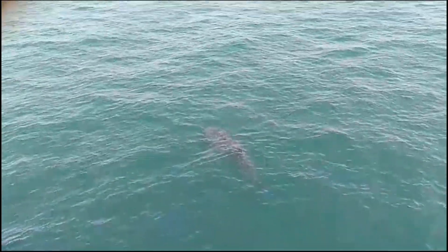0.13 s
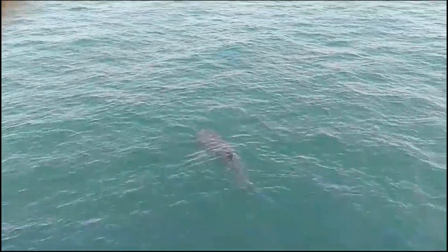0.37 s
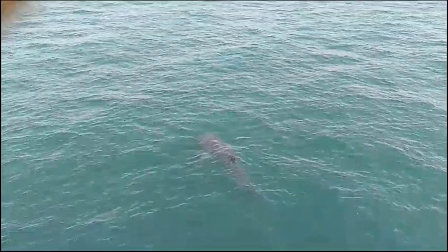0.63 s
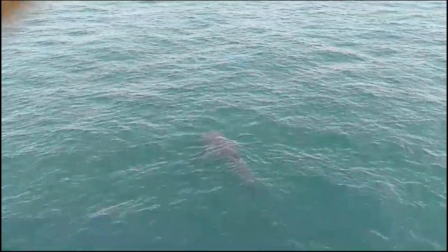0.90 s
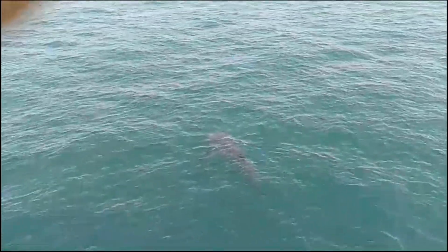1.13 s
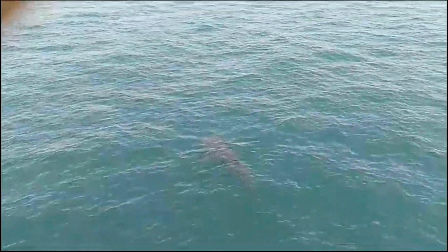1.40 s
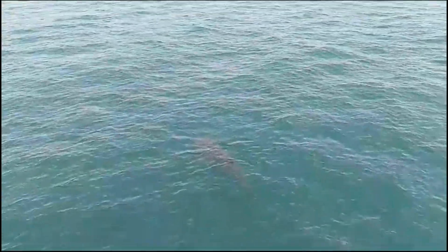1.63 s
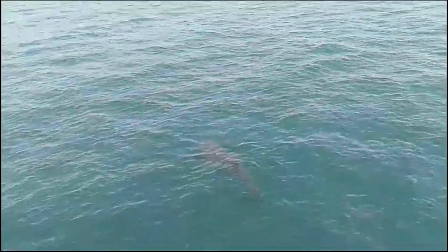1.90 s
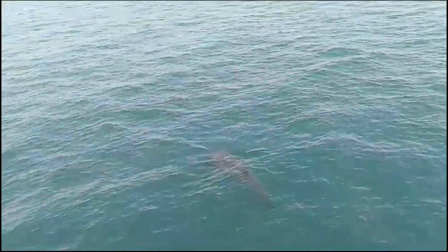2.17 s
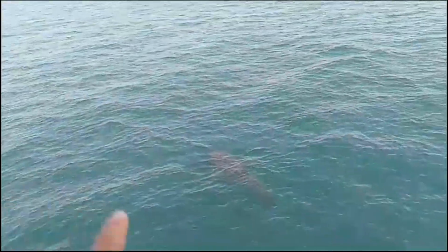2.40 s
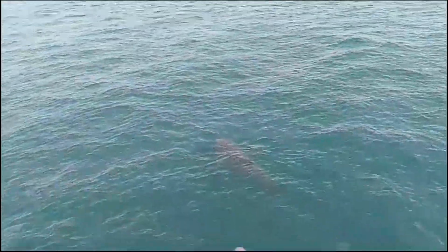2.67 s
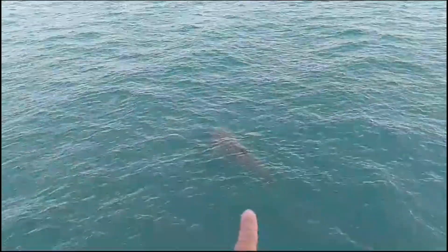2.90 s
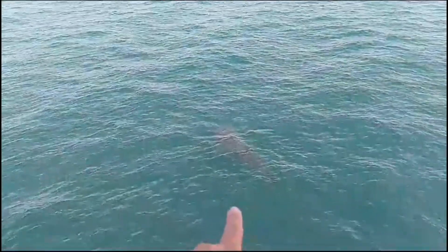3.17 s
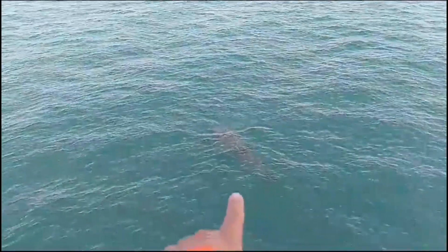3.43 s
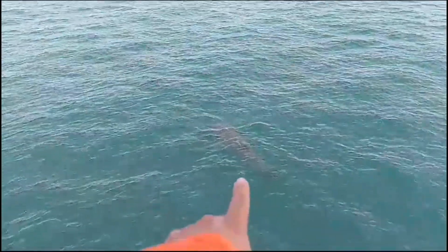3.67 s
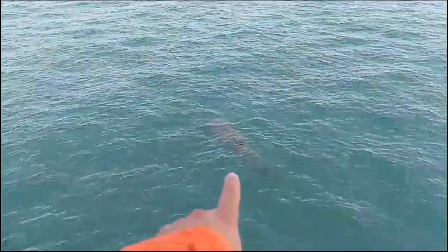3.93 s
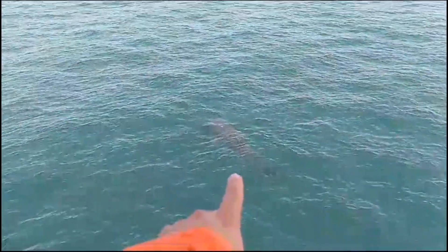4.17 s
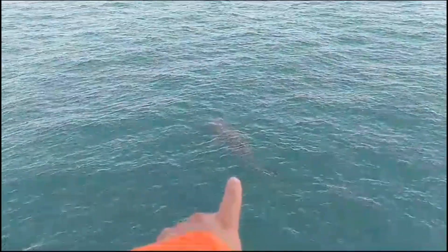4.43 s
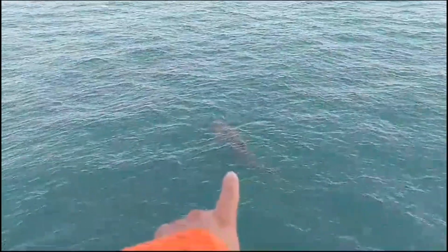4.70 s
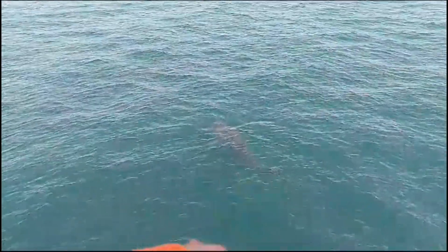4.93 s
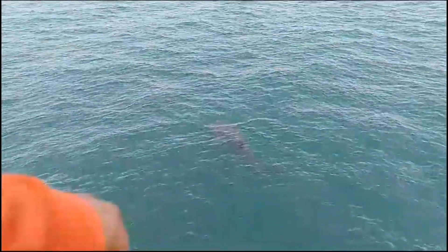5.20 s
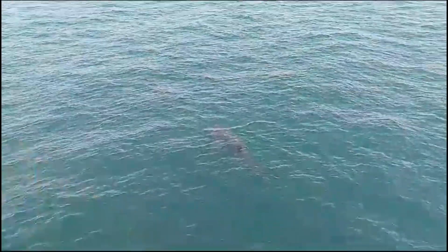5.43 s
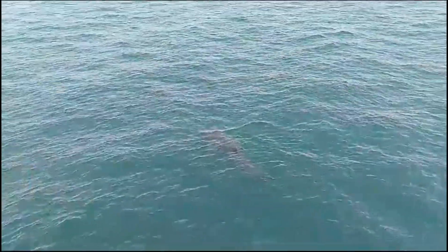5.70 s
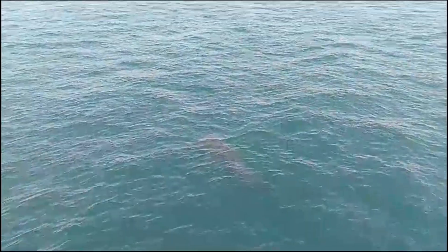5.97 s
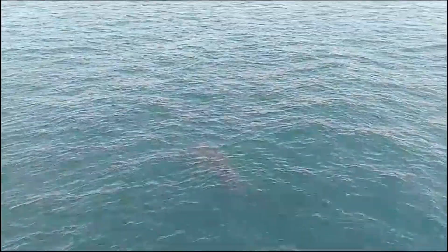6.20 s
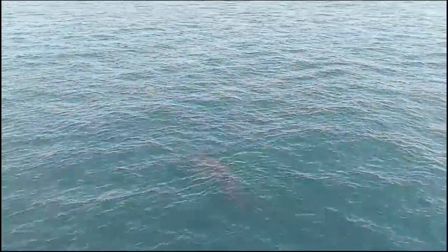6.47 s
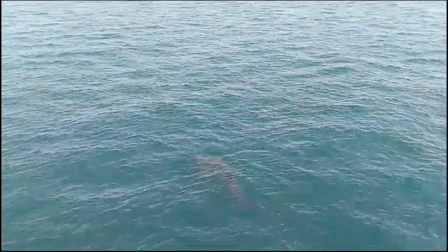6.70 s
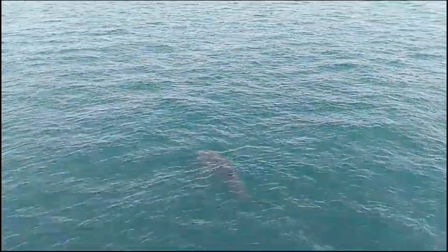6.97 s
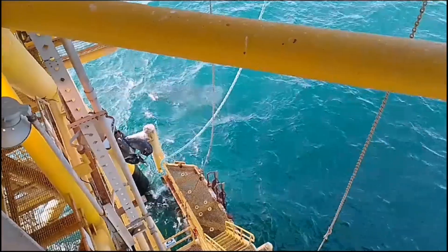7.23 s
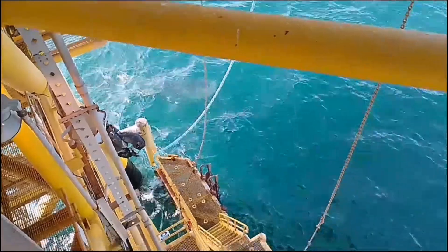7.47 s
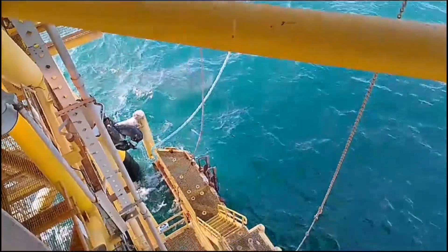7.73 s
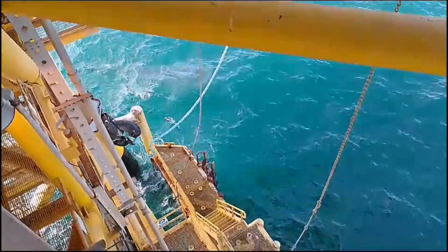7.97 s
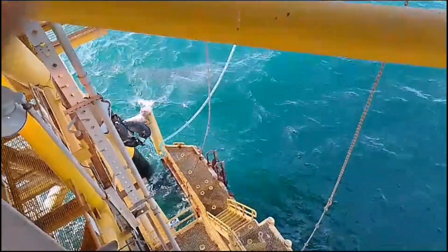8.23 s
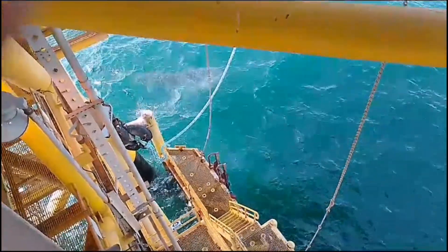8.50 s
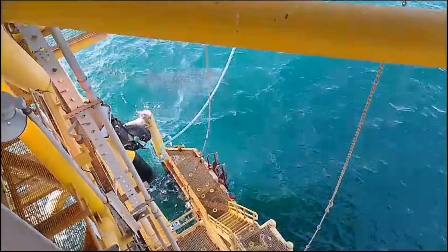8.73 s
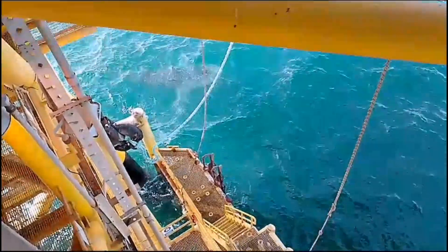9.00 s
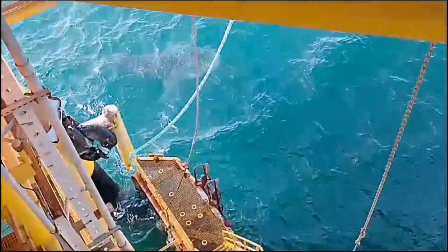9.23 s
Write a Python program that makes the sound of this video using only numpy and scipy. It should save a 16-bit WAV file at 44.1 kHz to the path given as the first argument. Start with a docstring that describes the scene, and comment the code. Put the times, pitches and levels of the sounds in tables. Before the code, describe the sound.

From 0 s, a dense machine drone fills the stereo field at an offshore platform rail: low engine hum with many buzzing harmonics, broad rumble coloured by ringing steel casings, and a fairly constant gear whine near 1 kHz. A faint dry tick sounds at about 0.26 s. In the treble, an air pump puffs soft hissing bursts roughly six per second, slightly uneven, every fourth stronger, over a steady leak; its pressure peaks around 2.3 s, stays strong until past 5.5 s, then eases near 6.7 s. The whine dips near 4 s and swells near 6 s. At 7.09 s all sound cuts abruptly to silence. From 7.3 s a second position closer to the machines fades in within about 0.13 s: heavier, steadier low hum, more prominent whine and thick roar, without pump puffs, holding almost unchanged to the end at about 9.4 s.

```python
"""Machinery deck of a sea platform heard from two places.
First the rail: a tick at 0.26 s, engine hum in shaft-order sines, gear whine near 1 kHz, a broad rumble of
filtered noise with resonant steel casings, and noise puffs from an air pump in the treble.
At 7.09 s it cuts to silence; from 7.3 s a second place, nearer the machines, fades in within 0.13 s:
the same kinds of hum, whine and rumble to the end, without the pump."""
import sys
import numpy as np
from scipy import signal
from scipy.io import wavfile
from scipy.ndimage import uniform_filter1d

SR = 44100
rng = np.random.default_rng(int(sys.argv[2]) if len(sys.argv) > 2 else 0)


def invert_db(level):
    """Linear amplitude ratio for a level in decibels (20 dB per decade), elementwise."""
    return 10 ** (np.asarray(level, dtype=float) / 20)


def persist_wave(psi):
    """Save psi, clipped to +-1, as 16-bit WAV."""
    counts = np.round(np.clip(psi, -1, 1) * 32767).astype(np.int16)
    wavfile.write(sys.argv[1], SR, np.atleast_2d(counts).T)


N = 413216
CUT_S = 7.0895  # end of the first place


def read(points, hz):
    """A spectrum table read on a log-frequency axis."""
    f, value = np.transpose(points)
    return np.interp(np.log(hz + 1), np.log(f + 1), value)


def slow(shape, width):
    """Unit random values smoothed along the last axis."""
    x = uniform_filter1d(rng.standard_normal(shape), width)
    x = uniform_filter1d(x, width)
    return x / x.std()


def noise(level_db, like, lead, lean, size):
    """Stereo noise from random short-time spectra; level_db(hz, t) is power per Hz, like(hz, t) likeness."""
    hop = size // 4
    hz = np.fft.rfftfreq(size, 1 / SR)[:, None]
    t = np.arange(N // hop + 5) * hop / SR
    a, b, c, d = rng.standard_normal((len(t), len(hz), 4)).T
    shared, own = a + 1j * b, c + 1j * d
    same = np.clip(like(hz, t), -1, 1)
    lean_db = read(lean, hz)
    left = shared * np.exp(1j * read(lead, hz)) * invert_db(lean_db / 2)
    right = (same * shared + np.sqrt(1 - same ** 2) * own) * invert_db(-lean_db / 2)
    scale = np.sqrt(3 * SR / (2 * size))  # unit power per Hz
    z = np.array([left, right]) * invert_db(level_db(hz, t)) * scale
    return signal.istft(z, nperseg=size, noverlap=size - hop)[1][:, :N]


RATED_HZ = 15.89  # shaft speed at which tone frequencies are listed
FAINT_SCATTER_DB, TOP_ORDER = 3.5, 70


def tones(speed, orders, faint, whines, whine_swell, phase, lean, waver, whine_waver, scatter_hz):
    """Sines locked to the shaft; reflections off steel make higher orders waver and shift between the ears."""
    t = np.arange(N // 8 + 1) * 8 / SR
    turns = np.cumsum(np.interp(t, *np.transpose(speed))) * 8 / SR
    strong, strong_db = np.transpose(orders)
    others = np.setdiff1d(np.arange(TOP_ORDER) + 1, strong)
    others_db = read(faint, others * RATED_HZ) + FAINT_SCATTER_DB * rng.standard_normal(len(others))
    order_hz = np.r_[strong, others] * RATED_HZ
    order_db = np.r_[strong_db, others_db]
    spread = np.minimum(order_hz / scatter_hz, 1)  # high orders come from many sides
    lean_random, lead_random = rng.standard_normal((len(order_hz), 2)).T
    lean_db = 3 * spread * lean_random + read(lean, order_hz)
    lead_rad = 0.9 * spread * lead_random + read(phase, order_hz)
    order_rows = np.c_[order_hz, order_db, lean_db, lead_rad, waver * np.sqrt(spread)]
    whine_rows = np.c_[whines, np.full(len(whines), whine_waver)]
    gear = invert_db(np.interp(t, *np.transpose(whine_swell)))
    coarse = np.linspace(0, t[-1], 200)
    out = np.zeros((2, len(t)))
    for hz, db, lr_db, rad, depth in np.r_[order_rows, whine_rows]:
        re, im = slow((2, 200), 7)
        drift = np.interp(t, coarse, re + 1j * im)
        gain = (1 + depth * drift) / np.sqrt(1 + 2 * depth ** 2)
        if abs(hz - 1000) < 20:  # main gear pair swells with load
            gain = gain * gear
        carrier = np.exp(2j * np.pi * (hz / RATED_HZ * turns + rng.random()))
        z = invert_db(db) * np.sqrt(2) * gain * carrier
        out += [(z * np.exp(1j * rad)).real * invert_db(lr_db / 2), z.real * invert_db(-lr_db / 2)]
    return signal.resample_poly(out, 8, 1, axis=1)[:, :N]


# four strokes repeat: peak re air pressure level/dB, half length/s
CYCLE = [(0.5, 0.053), (-3.5, 0.021), (-2.5, .05), (-5.5, 0.029)]
FIRST_STROKE_S, STROKE_S = 0.159, 0.1708
STROKE_JITTER_S, STROKE_SCATTER_DB = 0.01, 1


def strokes(pressure):
    """Rows (t/s, peak/dB, half length/s): the four-stroke cycle under the air pressure, slightly uneven."""
    s = np.arange(FIRST_STROKE_S, CUT_S, STROKE_S)
    db, half = np.resize(CYCLE, (len(s), 2)).T
    late, louder = rng.standard_normal((len(s), 2)).T
    db = db + np.interp(s, *np.transpose(pressure)) + STROKE_SCATTER_DB * louder
    return np.c_[s + STROKE_JITTER_S * late, db, half]


# puff colour before flow: f/Hz, level/dB per Hz
PUFF_COLOUR = [(600, -83), (1500, -73.5), (3000, -77.5), (5000, -80.5), (8000, -82), (11000, -83),
               (15500, -88)]
# extra puffs off the beat: t/s, peak level/dB, half length/s
SURGES = [(.769, -8.5, .06), (2.288, -2.5, 0.03), (4.852, -7, 0.046)]
# air pressure: t/s, level/dB
PRESSURE = [(0, -6.5), (1, -9.5), (1.9, -7), (2.3, -3.5), (4, -5), (5.6, -4.5), (6.1, -7.5), (6.7, -9),
            (7.1, -6.5)]
# left-right likeness of the puffs, before the offset below: f/Hz, likeness/1
PUFF_SAME = [(1000, .3), (6500, 0.11), (8600, 0.72), (10000, 1), (13000, 0.6), (14500, 1)]
# weight of the offset subtracted from the likeness: f/Hz, weight/1
OFFSET_WEIGHT = [(9800, 0.26), (10600, 1), (12800, 0.69), (13500, 0)]
# offset before weighting: t/s, offset/1
LIKENESS_OFFSET = [(1.9, .1), (2.2, .6), (2.7, .6), (3, 1.7), (5.7, 1.8), (6, .2)]
LEAK_DB = -11  # below pressure level
BRIGHTEN, BRIGHT_HZ = 0.5, 12000  # share of each pressure change added again at BRIGHT_HZ


def pump(lead, lean):
    """Noise puffs of air, every fourth stronger, over a steady leak; harder air is brighter."""
    puffs = np.r_[strokes(PRESSURE), SURGES]

    def level_db(hz, t):
        pressure_db = np.interp(t, *np.transpose(PRESSURE))
        flow = invert_db(2 * (LEAK_DB + pressure_db))  # power
        for s, db, half in puffs:
            flow += invert_db(2 * db) * np.exp(-((t - s) / half) ** 2)
        patches = uniform_filter1d(slow((len(hz), len(t)), 7), 16, 0)  # random level patches, about 1.4 kHz wide
        bright_db = BRIGHTEN * (pressure_db - pressure_db.mean()) * hz / BRIGHT_HZ
        patches_db = 2.6 * patches / patches.std()
        return read(PUFF_COLOUR, hz) + bright_db + 10 * np.log10(flow) + patches_db

    def like(hz, t):
        offset = np.interp(t, *np.transpose(LIKENESS_OFFSET))
        return read(PUFF_SAME, hz) - read(OFFSET_WEIGHT, hz) * offset
    return noise(level_db, like, lead, lean, size=512)


# small dry tick: t/s, peak level/dB, f/Hz, t60/s
TICK = (.259, -31, 5800, .003)


def tick():
    """One short ring: a sine decaying exponentially."""
    s, db, hz, t60 = TICK
    t = np.maximum(np.arange(N) / SR - s, 0)
    return invert_db(np.maximum(db - 60 * t / t60, -200)) * np.sin(2 * np.pi * hz * t)


SWELL_HZ, SWELL_WIDTH_HZ = 310, 320  # band that swells most


def roar(spectrum, rings, swell, same, lead, lean, patchy_db, lump_scale):
    """Broad machine noise; casing and pipe resonances and a broad lift near 6.4 kHz raise bands, random patches
    drift through it."""
    def level_db(hz, t):
        lift_db = sum(db / (1 + (2 * (hz - f) / width) ** 2) for f, width, db in rings)
        patches = uniform_filter1d(slow((len(hz), len(t)), 3), 40, 0)
        patches_db = patchy_db * patches / patches.std()
        lumps = uniform_filter1d(slow((len(hz), len(t)), 4), 4, 0)
        lumps_db = lump_scale * lumps * (hz < 500)  # low rumble surges in narrow lumps
        swell_db = np.interp(t, *np.transpose(swell)) / (1 + (2 * (hz - SWELL_HZ) / SWELL_WIDTH_HZ) ** 2)
        return read(spectrum, hz) + lift_db + swell_db + patches_db + lumps_db
    return noise(level_db, lambda hz, t: read(same, hz), lead, lean, size=4096)


# shaft speed: t/s, f/Hz
SPEED_RAIL = [(0, 15.875), (1, 15.91), (2.7, 15.907), (3.6, 15.875), (4.4, 15.875), (5.4, 15.93),
              (7.05, 15.942)]
# strong shaft orders, halves from uneven firing: multiple/1, level/dB rms
ORDERS_RAIL = [(4, -41.5), (5, -40), (5.5, -45), (6, -44.5), (6.5, -39), (7.5, -41.5), (9, -48), (9.5, -43),
               (10.5, -46.5), (14, -48.5), (15, -44), (16, -42), (17, -45), (18, -44.5), (19, -47.5),
               (21, -43), (22, -43), (23, -41.5), (24, -44.5), (26, -46), (27, -46), (31, -47), (34, -51.5),
               (41, -52)]
# other whole orders, before scatter: f/Hz, level/dB rms
FAINT_RAIL = [(16, -80), (32, -52), (480, -51), (600, -58), (850, -70), (950, -57), (1110, -65)]
# gear whines and lower hums, before swell: f/Hz at RATED_HZ, level/dB rms, left-right/dB, left lead/rad
WHINES_RAIL = [(29.9, -51.5, -0.1, 0.0), (34.8, -54.7, -0.2, 0.0), (60.1, -46.2, -0.0, 0.0),
               (75.0, -41.0, 0.2, 0.1), (90.2, -41.3, 0.2, 0.1), (128.0, -50.0, -0.2, 0.0),
               (306.2, -39.6, -0.0, 0.0), (922.6, -48.2, -2.2, -1.8), (962.8, -55.3, -2.3, 2.8),
               (994.2, -42.6, -0.5, -1.0), (1009.9, -44.3, -6.9, -0.5), (1460.7, -52.5, -0.3, -2.1),
               (1476.5, -55.2, -7.9, -1.6)]
# main gear pair swell: t/s, level/dB
WHINE_SWELL_RAIL = [(0, -2), (2, 0), (3, -0.7), (4.1, -3.5), (4.7, -1), (5.9, 2.5), (6.4, -0.5), (7.1, 0.5)]
# rumble and roar between the lines, before lifts: f/Hz, level/dB per Hz
ROAR_RAIL = [(20, -78), (32, -73), (60, -55), (110, -53.5), (200, -59), (260, -52.5), (450, -60),
             (850, -71), (1250, -74.5), (2000, -76), (2700, -80), (4500, -87), (9000, -91.5), (15500, -112)]
# ringing casings and pipes, and a broad lift near 6.4 kHz: f/Hz, width/Hz, lift/dB
RINGS_RAIL = [(982, 105, 8.5), (1476, 260, 4.5), (2317, 160, 7), (3097, 270, 13.5), (4030, 120, 4.5),
              (6440, 670, 9.5), (7440, 300, 6.5)]
# low rumble swell at SWELL_HZ: t/s, level/dB
SWELL_RAIL = [(0, -2), (1.5, -1.5), (2.5, 1.5), (3.7, 1.5), (4.8, 1.5), (5.4, -1), (7.1, -1)]
# left-right likeness, clipped to -1..1: f/Hz, likeness/1
SAME_RAIL = [(40, 2), (130, 1), (290, 0.87), (640, .5), (1400, 0.3), (3100, -0.03), (6000, 0.28),
             (8600, 1.4), (15000, -1.5)]
# left-right phase: f/Hz, left lead/rad
LEAD_RAIL = [(300, 0), (520, 0.2), (1460, -2.5), (6000, 0.5)]
# left-right balance: f/Hz, left re right/dB
LEAN_RAIL = [(60, 0.0), (240, 0.0), (950, -1.0), (3770, -1.0), (15000, 0.5)]


def rail():
    """First place, at the rail facing the sea: hum, pump, tick and roar summed."""
    hum = tones(SPEED_RAIL, ORDERS_RAIL, FAINT_RAIL, WHINES_RAIL, WHINE_SWELL_RAIL, LEAD_RAIL, LEAN_RAIL,
                waver=0.6, whine_waver=0.12, scatter_hz=800)
    rumble = roar(ROAR_RAIL, RINGS_RAIL, SWELL_RAIL, SAME_RAIL, LEAD_RAIL, LEAN_RAIL,
                  patchy_db=1.0, lump_scale=5.0)
    return hum + rumble + pump(LEAD_RAIL, LEAN_RAIL) + tick()


# shaft speed: t/s, f/Hz
SPEED_DECK = [(0, 15.898)]
# strong shaft orders, halves from uneven firing: multiple/1, level/dB rms
ORDERS_DECK = [ (3, -44), (4, -42.5), (5, -41), (5.5, -41.5), (6, -33), (6.5, -46), (7, -40.5), (7.5, -44),
               (9, -41), (10.5, -44.5), (11, -45.5), (16, -43), (17, -40.5), (19, -46), (23, -41),
               (24, -46), (26, -44), (27, -38), (28, -44.5), (30, -45.5), (31, -42), (32, -42.5), (36, -47),
               (42, -47), (43, -49), (52, -48.5), (54, -49.5), (58, -50), (60, -42.5)]
# other whole orders, before scatter: f/Hz, level/dB rms
FAINT_DECK = [(16, -74), (60, -50), (130, -48), (480, -50), (620, -55), (900, -60), (1110, -56)]
# gear whines and lower hums, before swell: f/Hz at RATED_HZ, level/dB rms, left-right/dB, left lead/rad
WHINES_DECK = [(74.9, -49, -1, 0), (89.9, -32.3, 0, .2), (165.1, -42, 1.1, .1), (215.8, -47, -2, .4),
               (262, -47, -.5, .2), (375, -43.8, 1.6, .3), (923.9, -49, -1.8, .3), (963.8, -44.1, 4.9, .3),
               (995, -35.6, 2, .9), (1010.7, -51.2, 8, -.7), (1462.5, -49.2, 6.3, -2.3),
               (1510.5, -53.4, 3.4, 2.1), (2305.8, -57.9, 8, -1.8), (2464, -56.5, 2.8, .4)]
# main gear pair swell: t/s, level/dB
WHINE_SWELL_DECK = [(7.4, 0.9), (8.4, 0.4), (9.4, -0.9)]
# rumble and roar between the lines, before lifts: f/Hz, level/dB per Hz
ROAR_DECK = [(20, -72), (32, -66), (60, -63), (110, -56), (200, -61), (260, -58.5), (450, -60),
             (850, -69.5), (1250, -66.5), (2000, -68.5), (2700, -74), (4500, -83.5), (9000, -90.5),
             (15500, -93.5)]
# ringing casings and pipes, and a broad lift near 6.4 kHz: f/Hz, width/Hz, lift/dB
RINGS_DECK = [(960, 80, 12), (1480, 120, 1.2), (2260, 290, 2.8), (3155, 290, 6.7), (4070, 250, 6.7),
              (6430, 980, 9.4), (7430, 740, 5.4)]
# left-right likeness: f/Hz, likeness/1
SAME_DECK = [(40, 1), (130, .97), (290, 0.79), (640, 0.53), (1400, 0.29), (3100, 0.15), (5800, 1),
             (7500, 0.81), (9000, 0.81)]
# left-right phase: f/Hz, left lead/rad
LEAD_DECK = [(300, 0), (1030, 0.7), (1720, 2.5), (2100, 0.5), (3010, -1.4), (3880, 0.5)]
# left-right balance: f/Hz, left re right/dB
LEAN_DECK = [(60, -1), (240, 1), (950, 3.5), (3770, 0.5), (15000, 1.5)]


def deck():
    """Second place, nearer the machines: hum and roar summed, no rumble swell."""
    hum = tones(SPEED_DECK, ORDERS_DECK, FAINT_DECK, WHINES_DECK, WHINE_SWELL_DECK, LEAD_DECK, LEAN_DECK,
                waver=0.2, whine_waver=0.08, scatter_hz=800)
    rumble = roar(ROAR_DECK, RINGS_DECK, [(0, 0)], SAME_DECK, LEAD_DECK, LEAN_DECK,
                  patchy_db=1.06, lump_scale=2.5)
    return hum + rumble


FADE_END_S, FADE_S, FADE_DB, FADE_BEND = 7.425, 0.13, -71, 1.32  # rises from FADE_DB to full level


def edit():
    """Gain of the edit: cut within a millisecond, silence, fade-in."""
    t = np.arange(N) / SR
    to_go = np.maximum(FADE_END_S - t, 0) / FADE_S
    fade = invert_db(FADE_DB * np.minimum(to_go, 1) ** FADE_BEND) * (to_go < 1)
    cut = np.clip((CUT_S - t) * 1000, 0, 1)
    return cut + fade


def scene():
    """The first place, then the second."""
    return np.where(np.arange(N) / SR < FADE_END_S - FADE_S, rail(), deck())


def top_cut(x):
    """Nothing passes above the cut-off."""
    return signal.sosfilt(signal.butter(12, 16180, fs=SR, output="sos"), x)


def record(dry):
    """Microphone bass cut at 24 Hz, band limit at 15.75 kHz, then the edit."""
    dry = signal.sosfilt(signal.butter(2, 24, "high", fs=SR, output="sos"), dry)
    edge = signal.firwin(511, 15750, window=("kaiser", 9), fs=SR)
    limited = signal.oaconvolve(dry, edge[None], "same", axes=1)
    return top_cut(limited * edit())


dry = scene()
out = record(dry)
persist_wave(out)
```